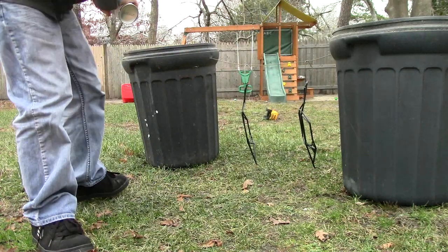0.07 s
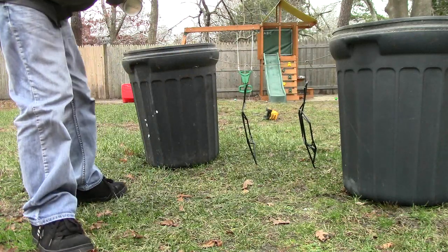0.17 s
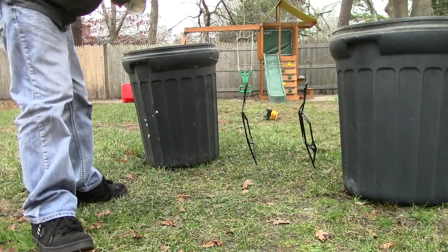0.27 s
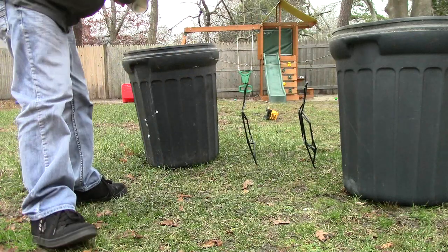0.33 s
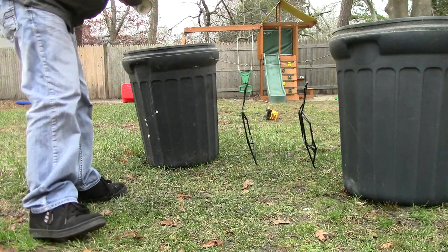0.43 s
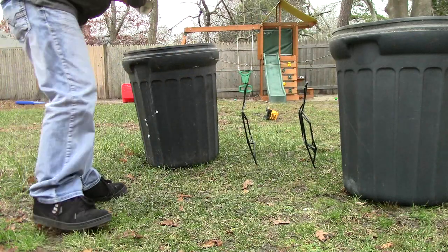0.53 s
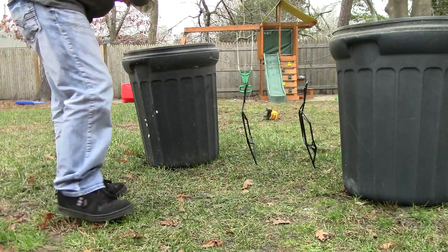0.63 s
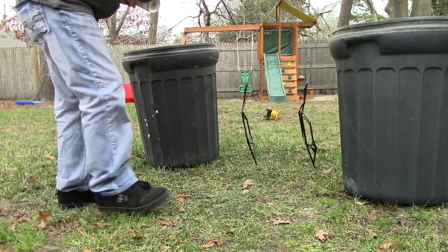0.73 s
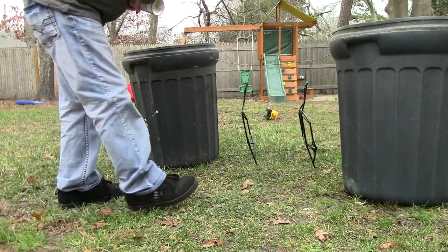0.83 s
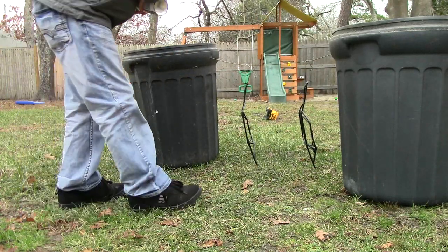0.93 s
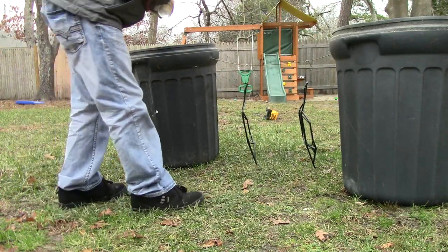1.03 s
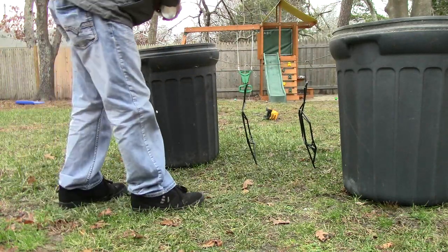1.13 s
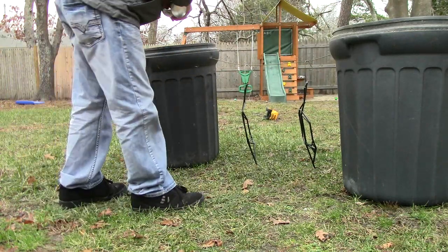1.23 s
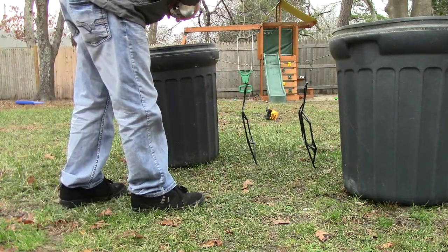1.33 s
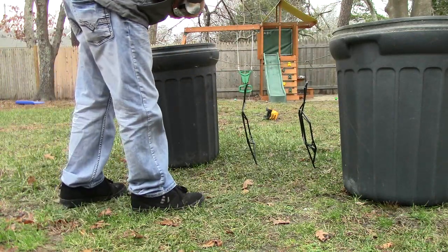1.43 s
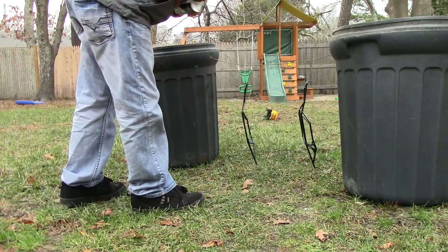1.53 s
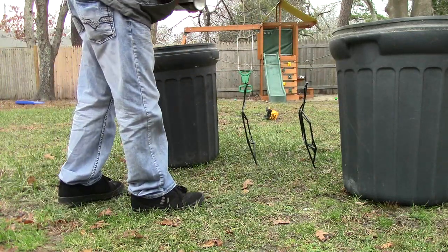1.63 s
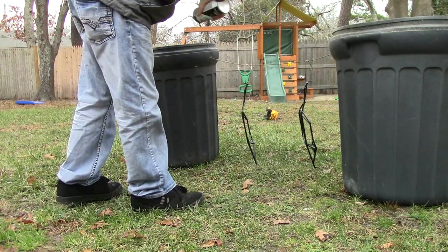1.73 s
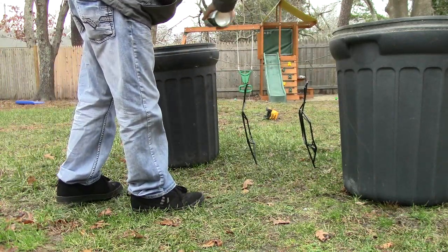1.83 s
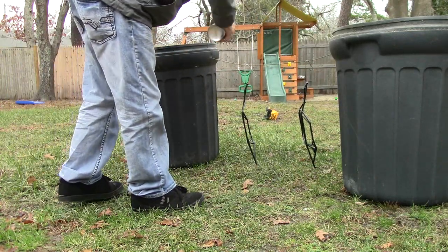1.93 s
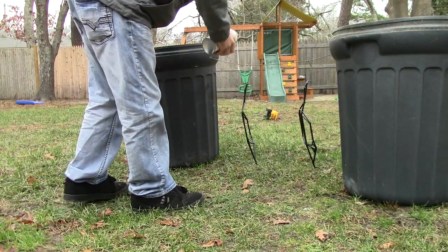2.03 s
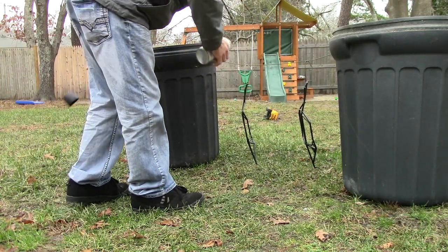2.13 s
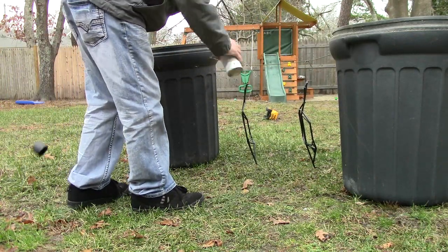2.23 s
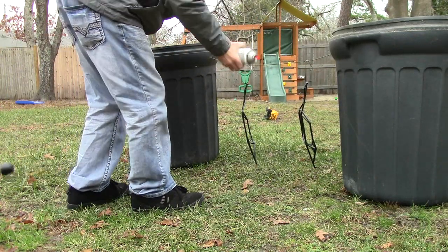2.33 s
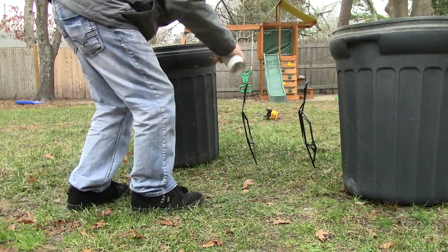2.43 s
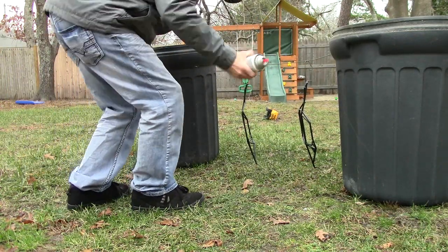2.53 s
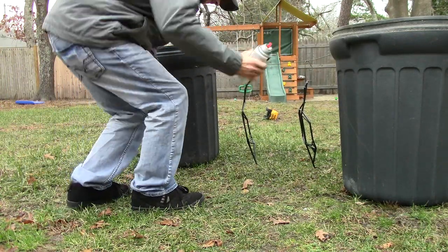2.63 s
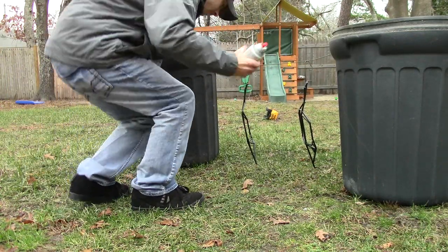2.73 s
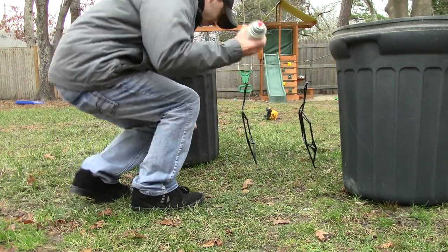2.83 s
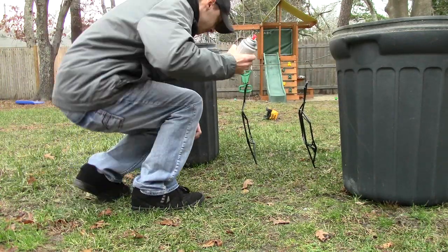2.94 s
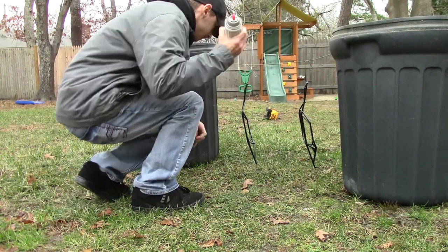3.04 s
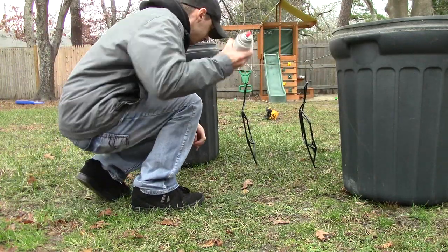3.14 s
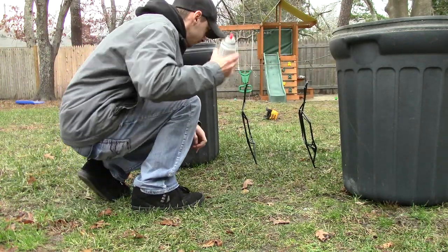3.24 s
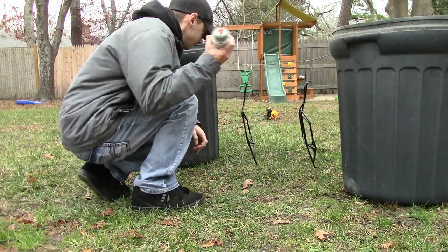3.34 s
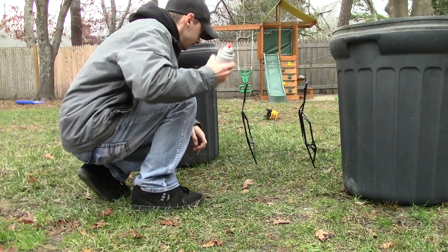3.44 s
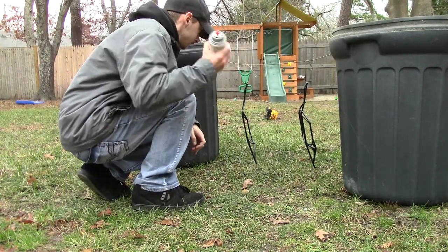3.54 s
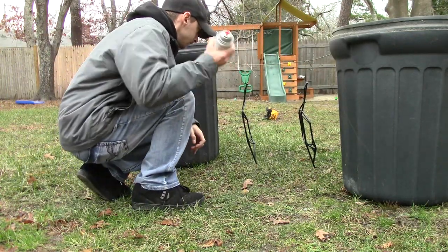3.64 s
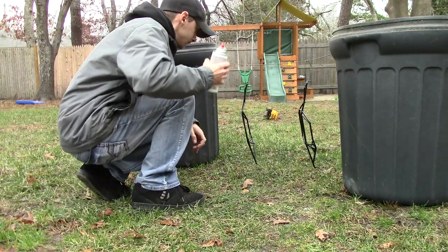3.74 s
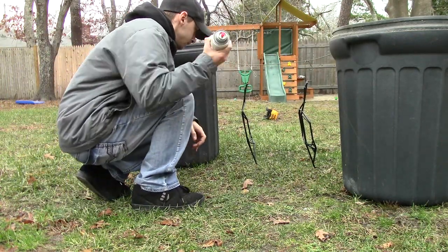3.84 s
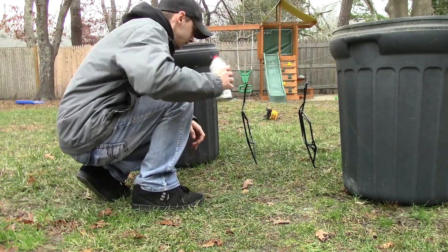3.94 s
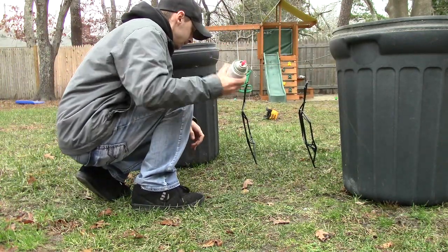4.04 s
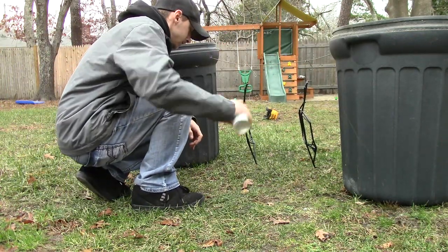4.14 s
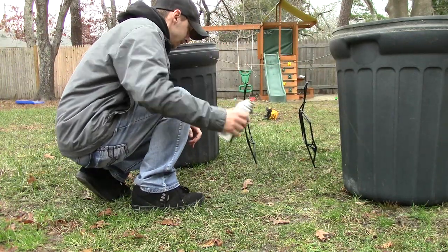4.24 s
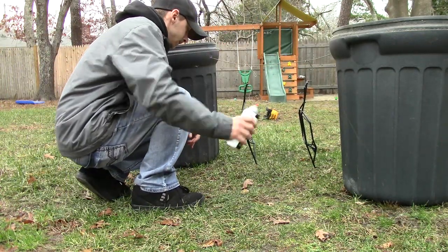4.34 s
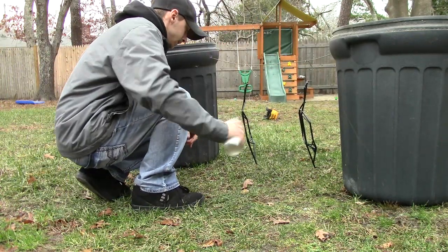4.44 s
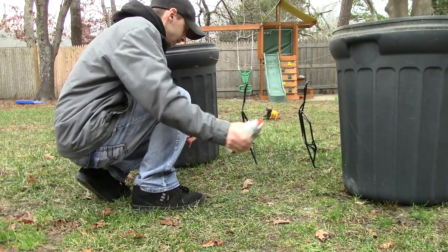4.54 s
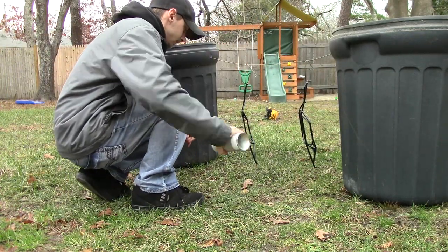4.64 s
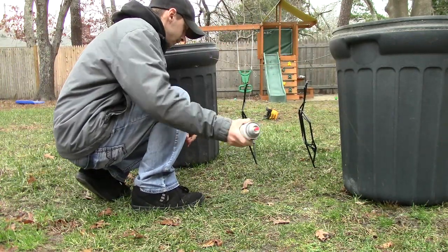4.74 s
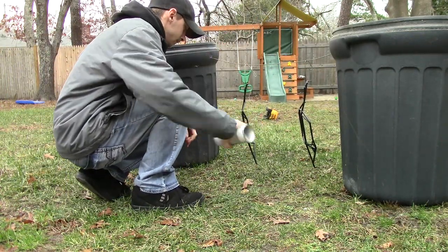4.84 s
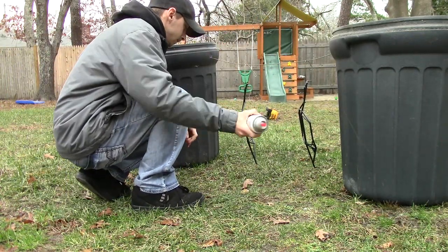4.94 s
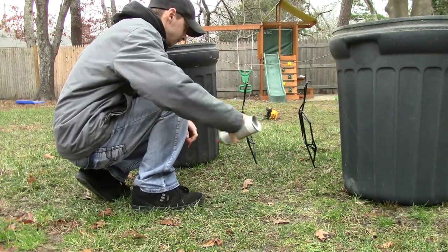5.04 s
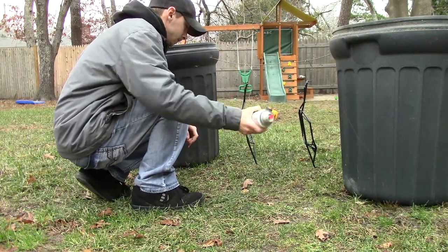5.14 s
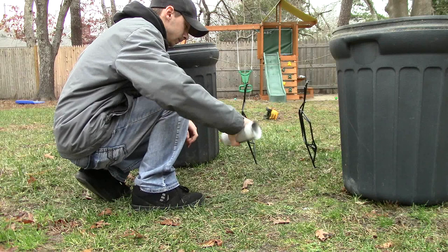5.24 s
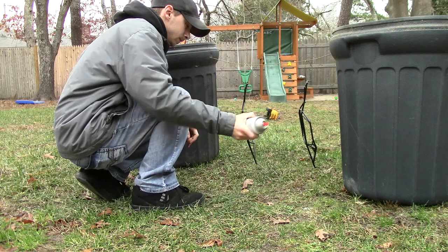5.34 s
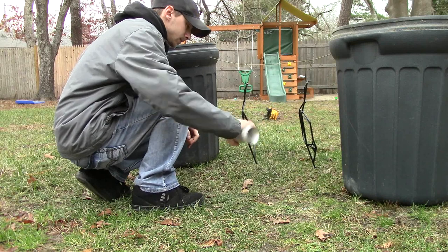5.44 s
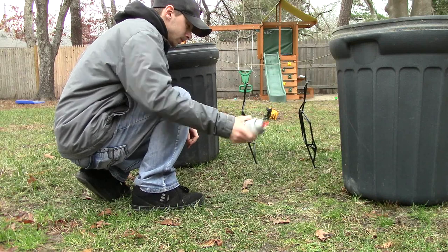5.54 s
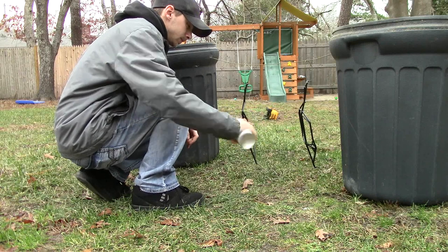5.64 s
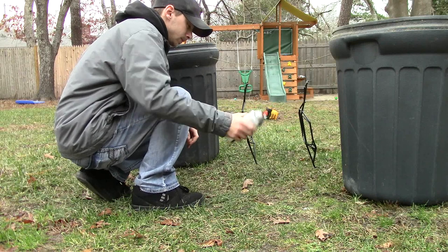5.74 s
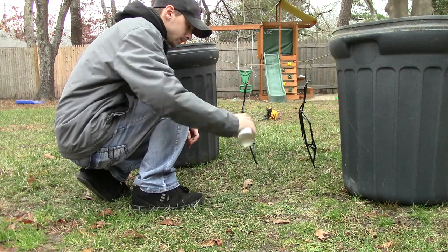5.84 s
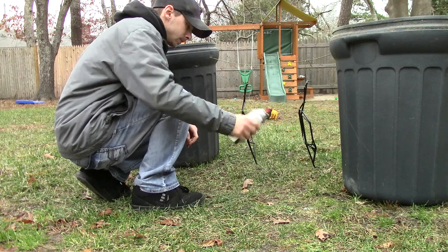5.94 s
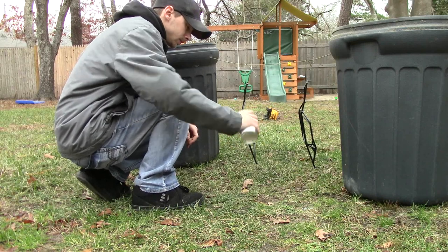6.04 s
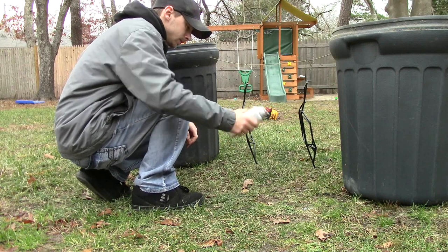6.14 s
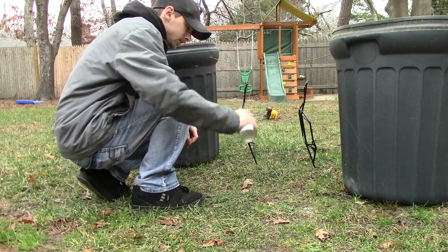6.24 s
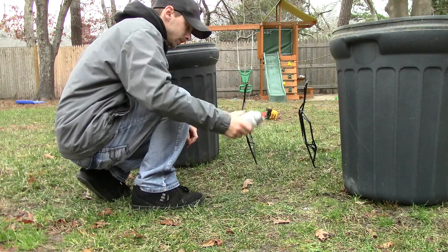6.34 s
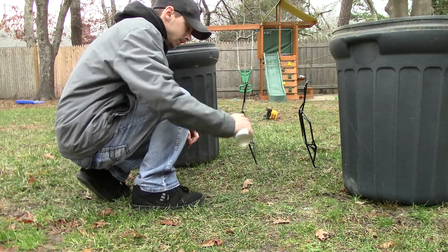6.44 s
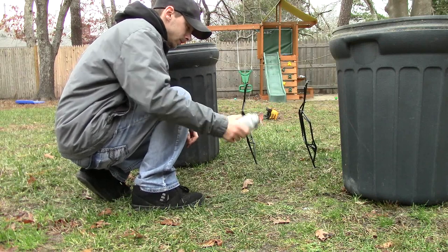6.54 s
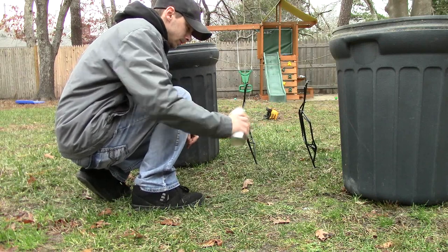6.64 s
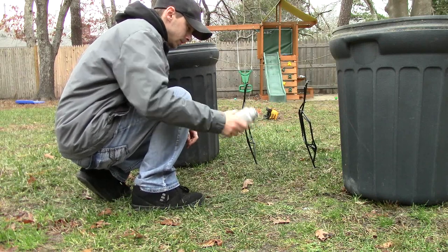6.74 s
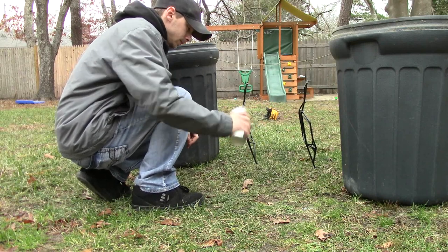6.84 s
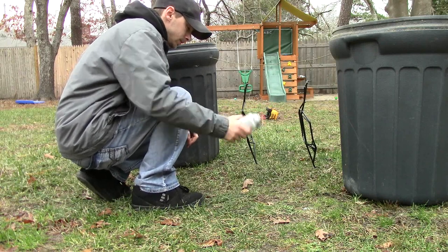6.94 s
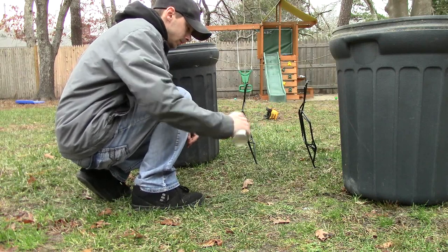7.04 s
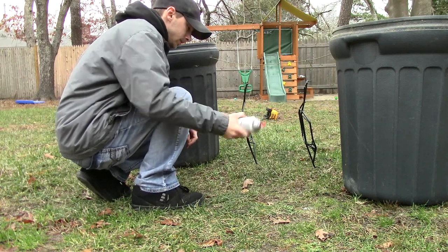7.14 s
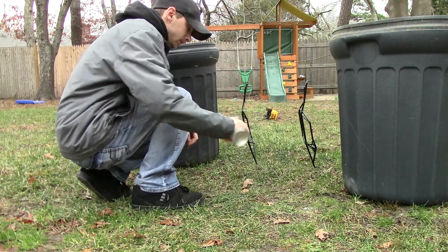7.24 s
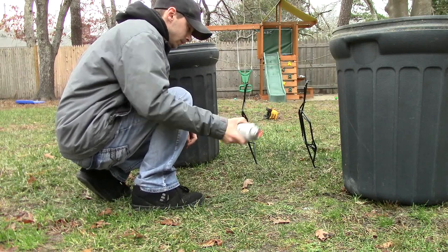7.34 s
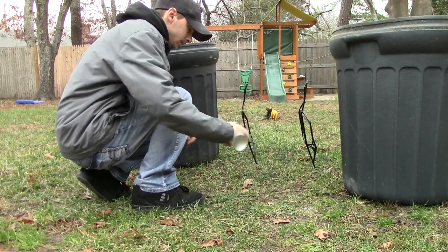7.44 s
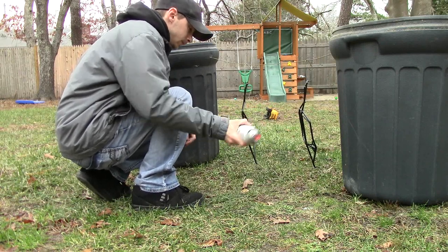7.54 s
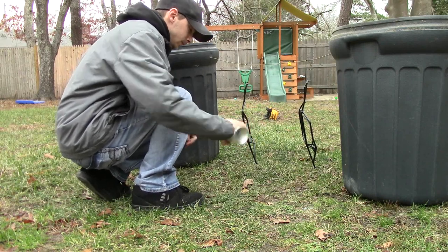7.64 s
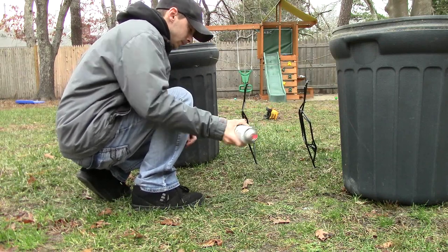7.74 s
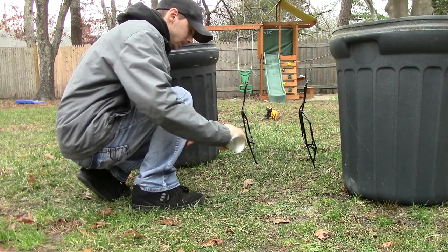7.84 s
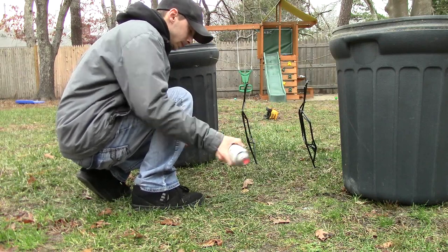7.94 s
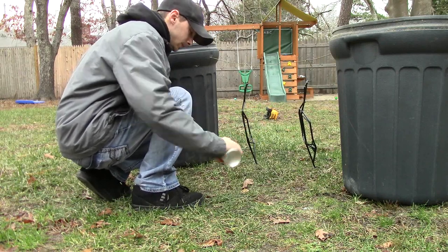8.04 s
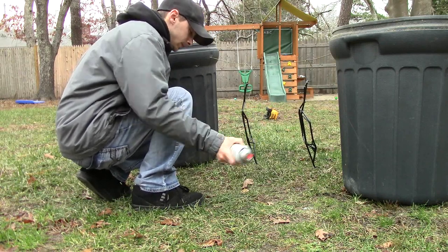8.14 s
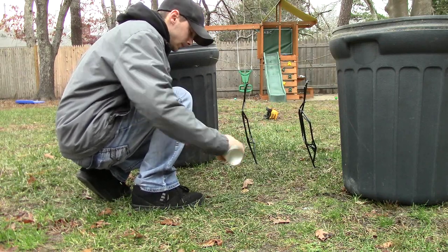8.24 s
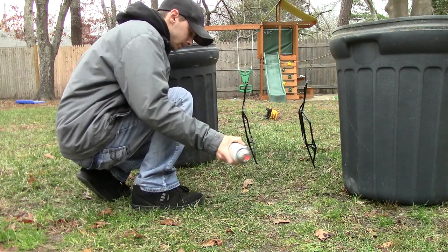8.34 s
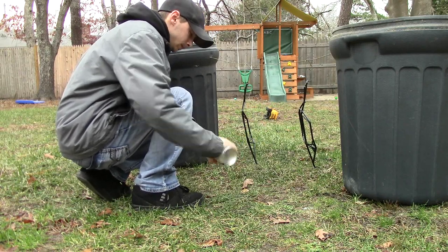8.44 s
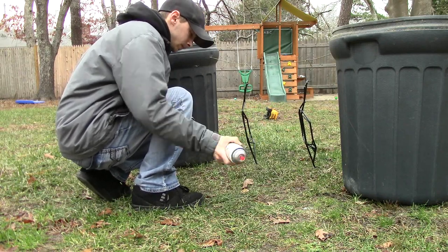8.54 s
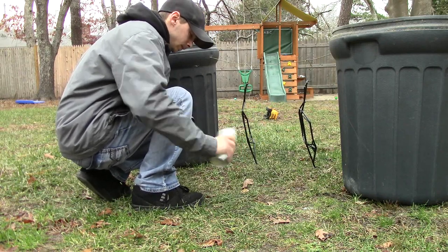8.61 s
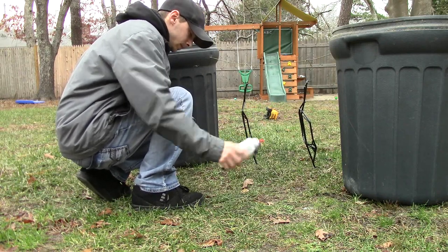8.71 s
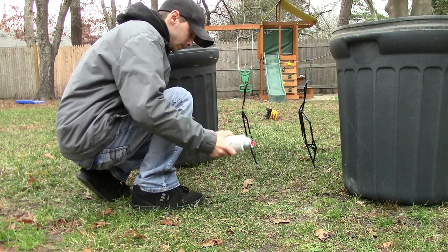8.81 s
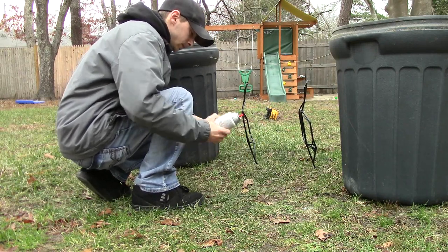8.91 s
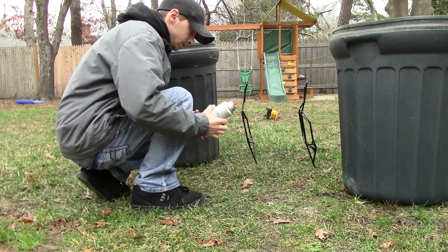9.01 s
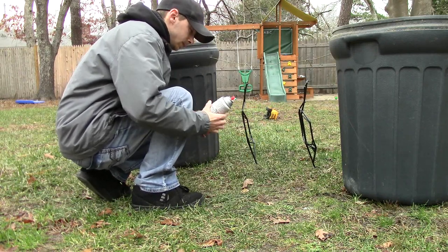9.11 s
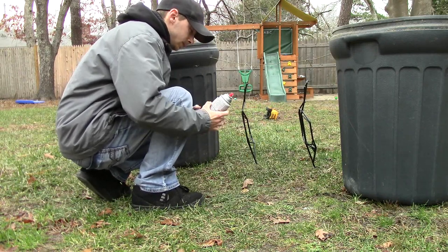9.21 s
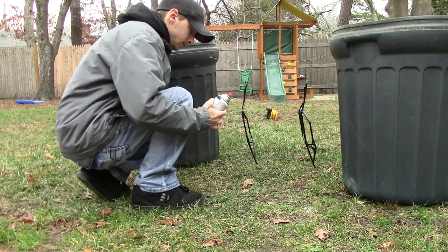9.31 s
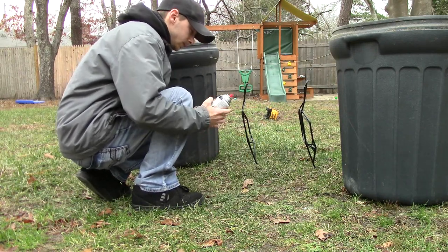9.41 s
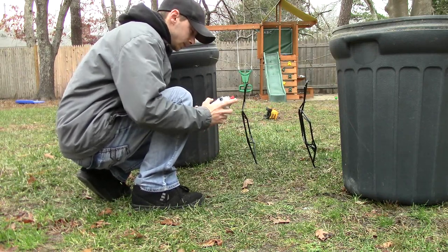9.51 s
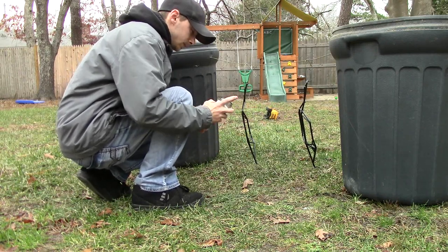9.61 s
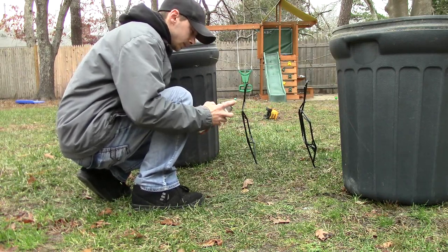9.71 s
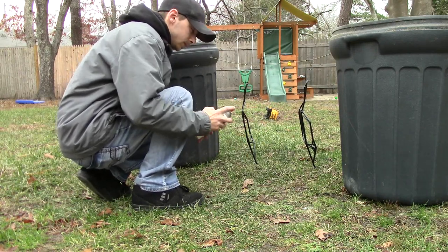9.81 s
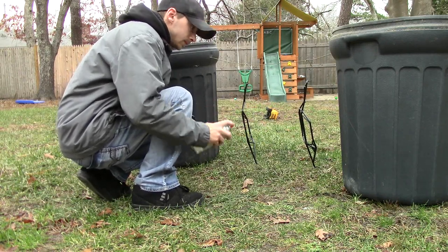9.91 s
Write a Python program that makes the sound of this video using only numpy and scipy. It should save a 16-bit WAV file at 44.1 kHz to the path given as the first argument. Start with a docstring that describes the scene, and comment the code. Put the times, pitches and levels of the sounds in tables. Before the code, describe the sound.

A quiet backyard, heard closely with hardly any echo and a low, distant traffic rumble. From 0 to 1.8 seconds, clothes and grass rustle softly, a shoe scuffs near 0.3, a few faint ticks come from a can, and a far bird gives thin falling calls near 0.5, 1.4 and 2.3. At 1.83 a plastic cap pops off in a sharp, quick burst. Light ball ticks follow from 2.0, with fuller rustling near 2.7. From 2.7 to 4.2 the mixing ball knocks in bright, hollow, mostly separate metallic clacks, with a short gap around 3.8. From 4.3 vigorous shaking makes a dense, uneven rattle, over ten strokes a second, with grainy swirling paint and a slight low air puff at 4.6. It is loudest until about 6.6, then softer and duller, rising a little near 8.6. Shaking stops around 9.0, leaving faint clicks and a barely audible bird until 10.

```python
"""A can of spray paint is shaken in a back yard: its mixing ball knocks singly, then each arm stroke rattles it.
Every blow rings modes of the paint-damped steel wall and adds a noise crack; noise makes the swirl of paint.
Before the shaking a plastic cap pops off, ringing modes of its own.
Shaped noise makes the rustling clothes and grass, a shoe scuff, a puff of air and distant traffic.
A far bird's falling calls are gliding sines; echoes and short noise tails make the yard."""
import sys
import numpy as np
from scipy import signal
from scipy.fft import rfft, irfft, next_fast_len
from scipy.io import wavfile
from scipy.ndimage import uniform_filter1d, minimum_filter1d

SR = 44100
rng = np.random.default_rng(int(sys.argv[2]) if len(sys.argv) > 2 else 0)


def store_wav(level_fs):
    """Save 16-bit WAV to argv[1]."""
    pcm = np.round(np.clip(np.atleast_2d(level_fs), -1, 1) * 32767)
    wavfile.write(sys.argv[1], SR, pcm.T.astype(np.int16))


N = 439677
TIME = np.arange(N) / SR


def from_db(db):
    """Decibels to gain."""
    return 10 ** (np.asarray(db) / 20)


def rms_one(x):
    """Scale to unit power."""
    return x / np.sqrt(np.mean(x ** 2) + 1e-20)


def gain_curve(rows):
    """Gain in time from (time_s, level_db) rows, fading before the first and 0.1 s after the last."""
    s, db = np.transpose(rows)
    outside_s = np.maximum(s[0] - TIME, 0) + np.maximum(TIME - s[-1] - 0.1, 0)
    fade_db = np.minimum(200 * outside_s, 100)
    return from_db(np.interp(TIME, s, db) - fade_db)


def swelling(middle_s, level_db, half_length_s):
    """Gain of a soft swell around a moment."""
    return from_db(level_db) / (1 + ((TIME - middle_s) / half_length_s) ** 4)


def filtered(x, hz, kind, order=2):
    """Butterworth filter."""
    sos = signal.butter(order, np.clip(hz, 10, 0.45 * SR), kind, fs=SR, output="sos")
    return signal.sosfilt(sos, x)


def noise(spectrum):
    """Unit-power noise with the given colour, falling away below its lowest point."""
    hz, db = np.transpose(spectrum)
    size = next_fast_len(N)
    f = np.maximum(np.arange(size // 2 + 1) * SR / size, 1)
    gain = from_db(np.interp(np.log(f), np.log(hz), db)) * np.minimum(f / hz[0], 1) ** 2
    white = rfft(rng.standard_normal(size))
    return rms_one(irfft(white * gain, size)[:N])


def drift(rate_hz):
    """Random wandering between rate_hz new targets a second, with unit power."""
    knots = rng.standard_normal(4000)
    return rms_one(np.interp(TIME * rate_hz, np.arange(len(knots)), knots))


def add(track, s, sound):
    """Mix a sound into a track at a time."""
    at = max(round(s * SR), 0)
    track[at:at + len(sound)] += sound[:max(N - at, 0)]


def widened(mid, side, side_db):
    """Two closely spaced microphones hear almost the same."""
    return mid + from_db(side_db) * side * np.array([[1], [-1]])


def scatter(x, t60, low_hz, high_hz, rise_s):
    """Diffuse outdoor tail from fence, trees and grass: decaying band noise convolved with the sound."""
    t = TIME[:SR]
    envelope = from_db(-60 * t / t60) * (1 - np.exp(-t / rise_s)) ** 2
    tail = filtered(rng.standard_normal(SR), [low_hz, high_hz], "band", order=1) * envelope
    return signal.fftconvolve(x, tail / np.sqrt(np.sum(tail ** 2)))[:N]


# echoes from ground and bins: columns [delay_s, level_db]
YARD_ECHOES = [(.0036, -37), (0.0181, -24.5)]


def yard(x):
    """A few near echoes and a faint, dull tail; the microphones differ mostly in the treble."""
    dull = filtered(x, 4700, "low", order=1)
    near = sum(from_db(db) * np.interp(TIME - delay, TIME, dull, left=0) for delay, db in YARD_ECHOES)
    tail = from_db(-27.0) * scatter(x, t60=0.25, low_hz=500, high_hz=3810, rise_s=0.0018)
    treble = filtered(x, 3600, "high")
    side = scatter(treble, t60=0.013, low_hz=300, high_hz=15000, rise_s=0.0002)
    balance = from_db([[-0.1], [0.1]])
    return widened(x + near + tail, side, side_db=-23.5) * balance


# level of the distant traffic over time: columns [time_s, relative level_db]
TRAFFIC_LEVEL = [(0.0, -45.5), (0.91, -46.5), (4.47, -44.5), (4.53, -43.5), (7.05, -52.5), (9.97, -52.5)]
# colour of the traffic: columns [freq_hz, density_db (per Hz)]
TRAFFIC_COLOUR = [(25, -29.5), (48, -17), (75, -2), (150, 1), (350, -1), (700, -3.5), (1200, -8.5),
                  (2200, -15.5), (5000, -31.5), (15000, -40)]


def traffic():
    """Far rumble: bass-heavy noise riding a slow level curve."""
    rumble = widened(noise(TRAFFIC_COLOUR), noise(TRAFFIC_COLOUR), side_db=-18.0)
    return from_db(0.5) * gain_curve(TRAFFIC_LEVEL) * rumble


# calls of the far bird: columns [start_s, relative level_db]
CALLS = [(.53, -46), (1.381, -50), (2.329, -43), (9.179, -55.5)]


def bird():
    """A thin, broken call that slides down and holds, smeared by the trees."""
    t, calls = TIME[:SR // 3], np.zeros(N)
    start_hz, end_hz, slide_s, length_s = 4150, 3030, 0.055, 0.24
    for s, level_db in CALLS:
        slide = end_hz + (start_hz - end_hz) * np.exp(-t / slide_s)
        pitch_hz = slide * (1 + 0.06 * drift(450)[:len(t)])
        # quick to open, slow to close
        swell = np.sin(np.pi * np.minimum(t / length_s, 1) ** 0.39).clip(0)
        flutter = from_db(2.7 * drift(70)[:len(t)])
        tone = np.sin(2 * np.pi * np.cumsum(pitch_hz) / SR)
        add(calls, s, from_db(level_db) * swell * flutter * tone)
    return 0.83 * calls + 0.4 * scatter(calls, t60=0.42, low_hz=1503, high_hz=7000, rise_s=0.0074)


# air pushed at the microphones by the hardest shaking: columns [middle_s, level_db, half_length_s]
AIR_PUFF = (4.6, -52.5, 0.089)


def draught():
    """A low puff of air on the microphones: swelling bass noise."""
    return swelling(*AIR_PUFF) * rms_one(filtered(rng.standard_normal(N), [22, 70], "band"))


def scuff():
    """A shoe slides through the grass: a narrow noise band that climbs in pitch."""
    middle_s, half_length_s, level_db = 0.265, 0.06, -47.5
    middle_hz, climb_octaves_per_s = 1740, 3.2
    slide_s = np.clip(TIME - middle_s, -2 * half_length_s, 2 * half_length_s)
    pitch_hz = middle_hz * 2 ** (climb_octaves_per_s * slide_s)
    # slow noise times a sine is a noise band around the sine
    rasp = filtered(rng.standard_normal(N), 260, "low") * np.sin(2 * np.pi * np.cumsum(pitch_hz) / SR)
    return swelling(middle_s, level_db, half_length_s) * rms_one(rasp)


# movement of jeans, jacket and grass: columns [time_s, relative level_db]
RUSTLE_LEVEL = [(0.0, -50), (1.08, -49), (1.48, -60), (1.84, -48), (2.21, -60.5), (2.68, -43.5),
                (4.01, -46), (4.4, -51.5)]
# colour of cloth and grass: columns [freq_hz, density_db (per Hz)]
RUSTLE_COLOUR = [(400, 7), (1000, 6), (2000, 3.5), (4000, 1), (8000, 0), (12000, -4), (15500, -14.5)]
# single swishes of a sleeve or trouser leg: columns [middle_s, level_db, half_length_s]
CLOTH_SWISHES = [(.93, -53.5, .04), (1.924, -44, 0.0093)]


def rustle():
    """Cloth and grass brush in uneven grains of noise, with a few soft swishes."""
    grains = rms_one(from_db(2.3 * drift(150) + 2.3 * drift(52) + 0.8 * drift(11)))
    brushing = widened(noise(RUSTLE_COLOUR), noise(RUSTLE_COLOUR), side_db=-26.5)
    swell = sum(swelling(*swish) for swish in CLOTH_SWISHES)
    swishes = swell * rms_one(filtered(rng.standard_normal(N), [1400, 2100], "band"))
    return from_db(3.0) * gain_curve(RUSTLE_LEVEL) * grains * brushing + swishes


# colour of the contact crack: columns [freq_hz, density_db (per Hz)]
CRACK_COLOUR = [(260, -13.5), (600, -6.5), (1200, -6), (3500, 1), (5600, 4), (8500, 2), (12000, -3),
                (15500, -17)]


def struck(blows, modes, focus_octaves, spread_db, detune, crack_db, crack_s, hardening_db, snap, snap_s):
    """Each blow rings the modes near its tone most: soft blows ping, hard blows snap and crack."""
    t, head = TIME[:SR // 20], round(0.0043 * SR)  # blows are levelled over their first 4.3 ms
    hz, mode_db, t60 = np.transpose(modes)
    decay = from_db(-60 * t / t60[:, None]) * (1 - np.exp(-t / 0.00026))
    first_swing = np.exp(-(t / snap_s) ** 4)
    crack_shape = (1 - np.exp(-t / 0.0001)) / (1 + t / crack_s) ** 2
    cracks, out = noise(CRACK_COLOUR), np.zeros(N)
    for s, level_db, tone_hz in blows:
        hardness = tone_hz / np.median(hz)
        strength, shift, phase = rng.standard_normal((3, len(hz)))
        if level_db < -65:  # too faint to hear
            continue
        distance = np.log2(hz / (0.93 * tone_hz)) / (focus_octaves * hardness)
        weight = from_db(mode_db + spread_db * strength) / (1 + distance ** 2)
        # the place of contact and the moving load change every mode a little
        mode_hz = hz * (1 + detune * shift)
        angle = 2 * np.pi * (mode_hz[:, None] * t + phase[:, None])
        # a strong first swing at the point of contact spreads into a weaker ring of the whole wall
        # light touches have no such swing and ring on for longer
        force = np.clip((level_db + 36) / 18, 0, 1)
        ring = weight @ (np.sin(angle) * decay ** (0.9 + 0.17 * force))
        ring = ring * (1 + snap * hardness * force * first_swing)
        crack = cracks[round(s * SR):][:len(t)] * crack_shape
        crack_gain = from_db(crack_db + hardening_db * np.log2(hardness))
        blow = ring / np.std(ring[:head]) + crack_gain * crack / np.std(crack[:head])
        add(out, s, from_db(level_db) * blow / np.std(blow[:head]))
    # so small a body radiates no bass
    return filtered(out, 170, "high")


# the cap pops off in a quick burst of knocks, followed by faint echoes:
# columns [start_s, level_db, tone_hz (nominal)]
CAP_POP = [(1.8266, -12.5, 2300), (1.8295, -12.5, 1520), (1.8331, -12.5, 800), (1.8462, -25, 640),
           (1.886, -33, 685), (1.903, -30.5, 1890)]
# modes of the hollow cap: columns [freq_hz, level_db, t60_s], all nominal
CAP_MODES = [(245, 4, 0.05), (454, 1, 0.023), (680, -3, 0.037), (826, 4, 0.025), (930, -10, 0.035),
             (1230, -4, 0.044), (1760, 7, 0.028), (1880, -6, 0.033), (2330, 4, 0.036), (2520, 1, 0.048),
             (3620, 1, 0.022), (4400, 2, 0.026)]


def cap():
    """The plastic cap pops off the rim: a burst of knocks and their faint echoes, voiced by the cap's modes."""
    return struck(CAP_POP, CAP_MODES, focus_octaves=0.78, spread_db=0.5, detune=0.0069, crack_db=-10.5,
                  crack_s=0.0024, hardening_db=3.0, snap=0.81, snap_s=0.0033)


# modes of the hollow gas space above the paint while the can is upright:
# columns [freq_hz, level_db, t60_s], all nominal
HOLLOW_MODES = [(887, -9, 0.087), (1018.5, 2, 0.032), (1232, 4.5, 0.034), (1388, -4.5, 0.061)]
# how strongly they speak: columns [time_s, level_db]
HOLLOW_LEVEL = [(2.45, -5.5), (2.75, -2.5), (3.7, -3), (4.22, -5.5), (4.5, -17)]


def hollow(knocks):
    """The gas space rings under the blows; its level varies less from blow to blow than the clack."""
    last_s = HOLLOW_LEVEL[-1][0]
    thuds = [(s, -17.5 + 0.33 * db, 1100) for s, db, _ in knocks if s < last_s and db > -38]
    ring = struck(thuds, HOLLOW_MODES, focus_octaves=1.6, spread_db=3.0, detune=0.08, crack_db=-25,
                  crack_s=0.003, hardening_db=-4, snap=1.0, snap_s=0.0048)
    return ring * gain_curve(HOLLOW_LEVEL)


# ball rolling and paint swirling between blows: columns [freq_hz, density_db (per Hz)]
SWIRL_COLOUR = [(130, -16), (400, -6.5), (800, -2), (1300, 2.5), (2000, 4.5), (3500, 1.5), (5500, -4.5),
                (9000, -18), (15000, -22.5)]


def swirl(ball):
    """Grainy noise of moving paint that follows the ball's power with a 40 ms memory."""
    keep = np.exp(-1 / (0.04 * SR))
    stirring = np.sqrt(signal.lfilter([1 - keep], [1, -keep], ball ** 2 + 1e-18))
    grains = rms_one(from_db(5.9 * drift(260)))
    return from_db(-15.5) * stirring * noise(SWIRL_COLOUR) * grains


# the clack grows duller as paint coats the wall: columns [time_s, treble_db]
WALL_TREBLE = [(0, 13), (3.3, 3.5), (4.3, -3), (6, -3.5), (9.9, -5)]


def coated(blows):
    """Paint on the wall takes the top off the clack over time."""
    treble = blows - filtered(blows, 13000, "low", order=1)
    return blows + (gain_curve(WALL_TREBLE) - 1) * treble


# the ball falls against the wall as the can is tilted: columns [start_s, level_db, tone_hz (nominal)]
# tone is low for a soft blow through paint, high for a hard dry one
SINGLE_KNOCKS = [(0.2545, -31.5, 6000), (1.3832, -38, 5540), (1.558, -44, 4900), (2.0138, -27.5, 2010),
                 (2.074, -27, 4230), (2.1775, -28.5, 1960), (2.2383, -32, 2260), (2.2644, -41, 4200),
                 (2.288, -34.5, 2090), (2.3225, -36.5, 2360), (2.3545, -28, 6500), (2.3904, -31.5, 2760),
                 (2.527, -21, 4440), (2.5913, -25, 4340), (2.6341, -20, 2460), (2.8624, -20, 2070),
                 (2.9109, -25.5, 1580), (3.011, -10, 3400), (3.0567, -24, 2300), (3.0946, -7, 4000),
                 (3.187, -13.5, 3120), (3.2683, -12, 4350), (3.3705, -17.5, 3200), (3.439, -10.5, 3870),
                 (3.5364, -18.5, 3580), (3.6075, -5.5, 4400), (3.665, -13, 3470), (3.9821, -11.5, 3750),
                 (4.0453, -23, 2000), (4.135, -15.5, 3280), (4.1741, -17.5, 2540), (4.2057, -16, 3360),
                 (9.0528, -32, 3330), (9.1154, -43, 1900), (9.2636, -42, 2300), (9.3166, -43, 2300),
                 (9.3384, -35, 3300), (9.381, -44.5, 2000), (9.5334, -37.5, 2720), (9.6613, -43.5, 3300),
                 (9.7718, -43, 3380), (9.864, -45.5, 1720)]


def rebounds():
    """After a knock the ball drops back once, softly: (start_s, level_db, tone_hz)."""
    delay_s, loss_db, rebound_hz = 0.015, 17.5, 2480
    s, db, _ = np.transpose(SINGLE_KNOCKS)
    late, louder, higher = rng.standard_normal((len(s), 3)).T
    times = s + delay_s * np.exp(0.29 * late)
    return list(zip(times, db - loss_db + 2.5 * louder, rebound_hz * 2 ** (0.25 * higher)))


# arm strokes throw the ball across the can and set it rattling:
# columns [start_s, first_blow_db, first_tone_hz (nominal), rattle_length_s, rattle_db]
ARM_STROKES = [(2.464, -28, 3400, .04, -26.5), (2.7375, -10, 4300, 0.031, -12.5),
               (2.7844, -13, 3100, 0.023, -19.5), (4.0709, -8, 3460, .03, -19),
               (4.2798, -13.5, 4300, 0.043, -14), (4.383, -8.5, 4200, 0.037, -9.5),
               (4.4403, -5.5, 4430, 0.089, -14), (4.5356, -4, 3240, 0.063, -12.5),
               (4.6232, -5.5, 4100, 0.048, -14), (4.6776, -10.5, 2300, .025, -12.5),
               (4.723, -10, 3220, 0.075, -8.5), (4.802, -10, 3500, 0.034, -12),
               (4.8686, -10.5, 3460, 0.016, -25), (4.9047, -7.5, 3450, 0.068, -14),
               (4.9978, -5.5, 4200, 0.031, -14), (5.043, -7, 2580, 0.03, -17.5),
               (5.0845, -10.5, 3950, 0.14, -15.5), (5.193, -13, 3400, 0.036, -16.5),
               (5.2568, -9, 2650, 0.067, -12), (5.363, -15.5, 3370, 0.039, -13.5),
               (5.444, -6.5, 2450, 0.0083, -12), (5.4882, -4.5, 2940, 0.047, -21),
               (5.554, -15.5, 3380, 0.068, -15.5), (5.643, -14.5, 2870, 0.063, -15.5),
               (5.8173, -8.5, 2540, 0.022, -10), (5.8688, -15.5, 3720, 0.038, -17),
               (5.9318, -14, 3230, 0.045, -16.5), (6.0113, -10, 3400, 0.016, -14.5),
               (6.0976, -8, 3320, 0.073, -17), (6.214, -11, 2420, 0.011, -17),
               (6.2529, -12, 4400, 0.0063, -24), (6.2861, -14.5, 3840, 0.091, -20.5),
               (6.4227, -14, 2940, 0.04, -17), (6.4898, -12.5, 3350, 0.045, -21.5),
               (6.5844, -14, 4200, 0.099, -16.5), (6.7316, -23.5, 3300, .012, -31),
               (6.7688, -22, 3400, 0.022, -23), (6.8226, -17.5, 2770, 0.032, -18.5),
               (6.8946, -18, 3330, .056, -26.5), (6.9693, -21.5, 3070, 0.087, -23),
               (7.0937, -18.5, 4200, 0.11, -24.5), (7.2279, -16.5, 2940, 0.074, -17),
               (7.337, -27, 3630, .018, -23.5), (7.3887, -22, 3060, 0.096, -22.5),
               (7.511, -29.5, 3100, .052, -26.5), (7.5782, -17, 2930, 0.097, -23),
               (7.687, -17, 3560, 0.03, -17), (7.7502, -25.5, 3300, .008, -33),
               (7.7793, -19.5, 4500, 0.039, -20), (7.873, -14, 4970, 0.068, -21),
               (8.013, -17, 4260, 0.12, -20), (8.1915, -21.5, 2600, 0.11, -23),
               (8.3064, -17, 3100, 0.014, -17), (8.3822, -16, 4230, 0.035, -20.5),
               (8.449, -23, 2780, 0.096, -22.5), (8.5858, -11, 4800, 0.081, -24.5),
               (8.713, -13.5, 3600, 0.027, -20), (8.812, -19.5, 4900, 0.059, -20.5),
               (8.895, -18.5, 3400, 0.035, -17.5), (8.9734, -25.5, 3900, 0.036, -31)]


def airborne_db(times, start):
    """Loss of contact in dB as the ball leaves the wall and flies free before the next stroke lands."""
    flight_s, loss_db = 0.028, 24.5
    landing = min([stroke[0] for stroke in ARM_STROKES if stroke[0] > start], default=TIME[-1])
    return loss_db * np.maximum(1 + (times - landing) / flight_s, 0) ** 2


def rattles(count):
    """The ball bounces unevenly between walls during a stroke, then settles: (start_s, level_db, tone_hz)."""
    bounce_s, unevenness, spread_db, settle_db_per_s = 0.0138, 0.38, 4.0, 1000
    bounce_hz, spread_octaves, tone_memory = 3180, 0.2, 0.14  # memory: share kept of the first blow's tone
    bounces = []
    for s, _, tone_hz, length, level_db in ARM_STROKES:
        late, louder, higher = rng.standard_normal((3, count))
        flights = np.exp(unevenness * np.clip(late, -1.5, 1.5))
        after = bounce_s * np.cumsum(flights / flights.mean())
        # a hard bounce spends the ball's speed, so the next tends to be soft
        uneven_db = spread_db * np.tanh(louder - np.roll(louder, 1))
        settling_db = settle_db_per_s * np.maximum(after - length, 0)
        bounce_db = level_db + uneven_db - settling_db - airborne_db(s + after, s)
        tone = bounce_hz * (tone_hz / bounce_hz) ** tone_memory * 2 ** (spread_octaves * higher)
        bounces += zip(s + after, bounce_db, tone)
    return bounces


# modes of the filled can: columns [freq_hz, level_db, t60_s], all nominal
CAN_MODES = [(1060, -11, 0.0051), (1440, -6.5, 0.037), (1703, 2, 0.018), (1908, 2.5, 0.021),
             (2051, 1.5, 0.024), (2260, 0, 0.02), (2534, -1, 0.021), (2876, -4.5, 0.03), (3136, -2, 0.027),
             (3423, 1, 0.022), (3625, 1.5, 0.022), (3850, 3, 0.016), (4310, 0.5, 0.027),
             (4737, -0.5, 0.025), (5220, -6, 0.025), (6320, -5, 0.032), (6930, 0, 0.033), (7780, 3.5, 0.02)]


def skitter(count):
    """During each stroke and briefly after it, the ball grazes the wall in small fading touches."""
    graze_loss_db, graze_hz = 10.5, 2680
    roll_on_s, roll_fade_db_per_s = 0.03, 248.5
    touches = []
    for s, _, _, length, level_db in ARM_STROKES:
        louder, higher = rng.standard_normal((2, count))
        after = 0.005 + (length + roll_on_s) * (np.arange(count) + rng.random(count)) / count
        fading_db = roll_fade_db_per_s * np.maximum(after - length, 0) + airborne_db(s + after, s)
        touch_db = level_db - graze_loss_db - fading_db + 3 * louder
        touches += zip(s + after, touch_db, graze_hz * 2 ** (0.27 * higher))
    return struck(touches, CAN_MODES, focus_octaves=0.77, spread_db=8.0, detune=0.03, crack_db=-15.5,
                  crack_s=0.0011, hardening_db=6.5, snap=0.3, snap_s=0.002)


def can():
    """The ball's blows and grazes ring the wall, and the grainy swirl of paint follows them."""
    first_blows = [stroke[:3] for stroke in ARM_STROKES]
    knocks = list(SINGLE_KNOCKS) + rebounds() + first_blows + rattles(count=10)
    blows = struck(knocks, CAN_MODES, focus_octaves=0.52, spread_db=3.0, detune=0.024, crack_db=-8.0,
                   crack_s=0.0019, hardening_db=8.0, snap=0.89, snap_s=0.0018)
    ball = coated(from_db(1.0) * blows) + from_db(1.5) * skitter(count=4)
    return ball + hollow(knocks) + swirl(ball)


def scene():
    """Can and cap close by, the neighbourhood behind."""
    close = yard(can() + cap())
    return close + rustle() + scuff() + draught() + bird() + traffic()


def record(dry):
    """A fast limiter holds the sharpest blows just under full scale; then the top is cut."""
    ceiling, window = 0.98, 45  # window in samples
    cutoff_hz = 16200
    allowed = ceiling / np.maximum(np.abs(dry).max(axis=0), ceiling)
    gain = uniform_filter1d(minimum_filter1d(allowed, window), window)
    top_cut = signal.ellip(10, 0.1, 70, cutoff_hz, fs=SR, output="sos")
    return signal.sosfilt(top_cut, dry * gain)


dry = scene()
out = record(dry)
store_wav(out)
```